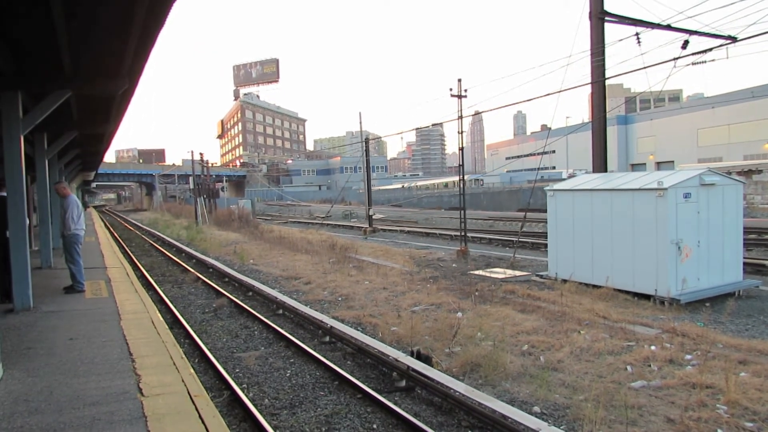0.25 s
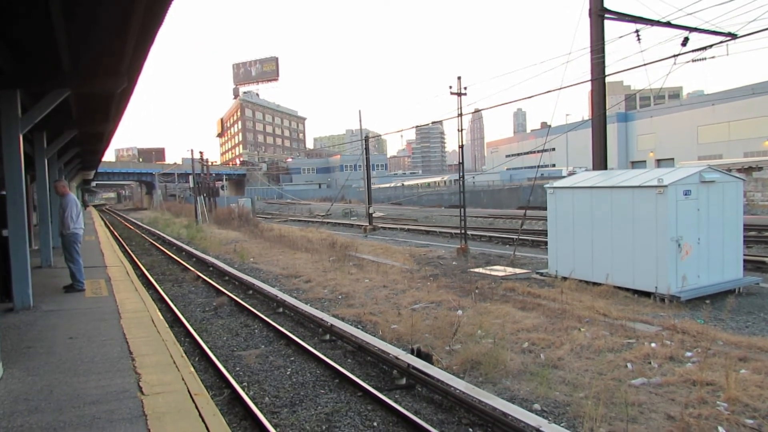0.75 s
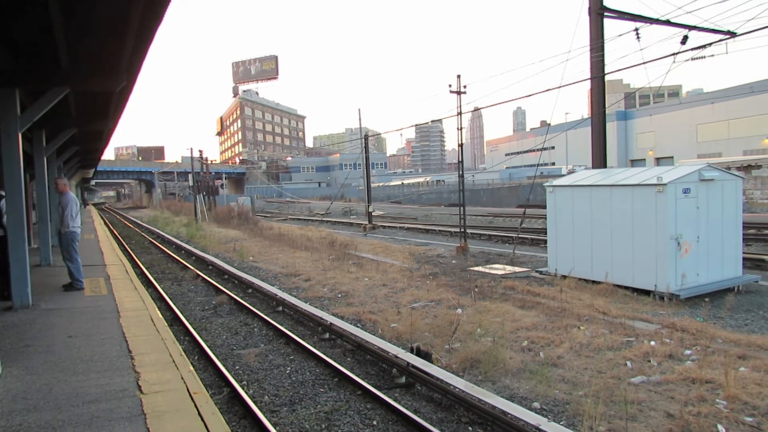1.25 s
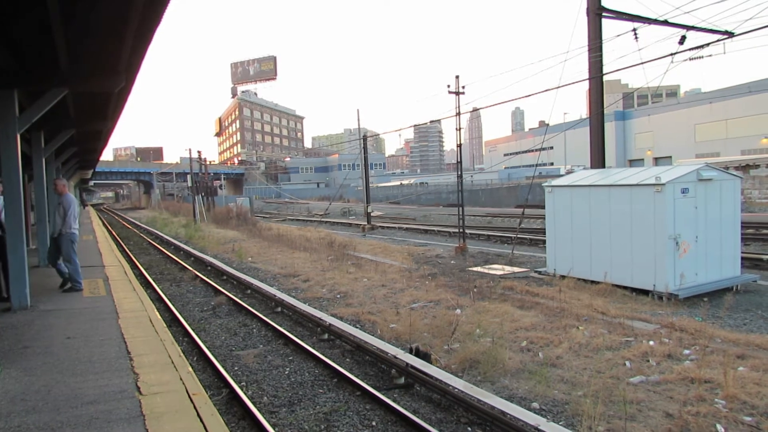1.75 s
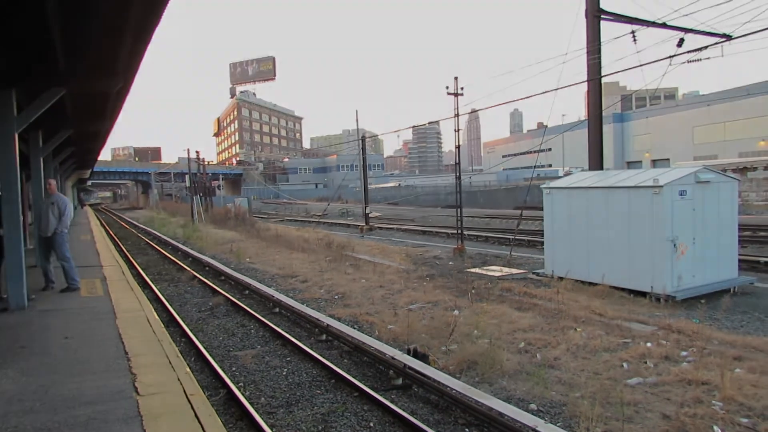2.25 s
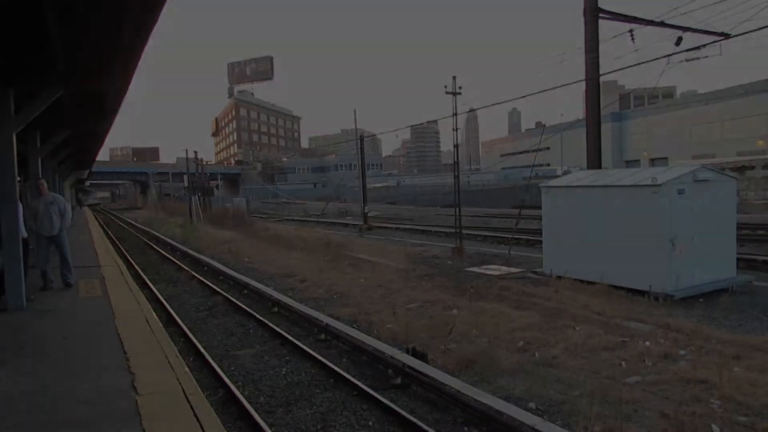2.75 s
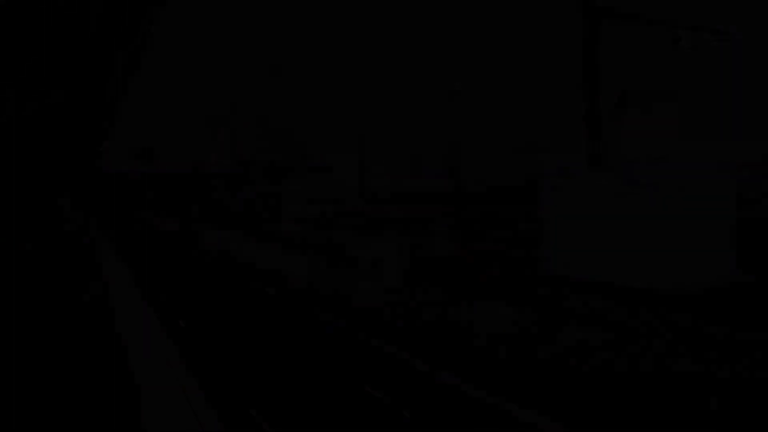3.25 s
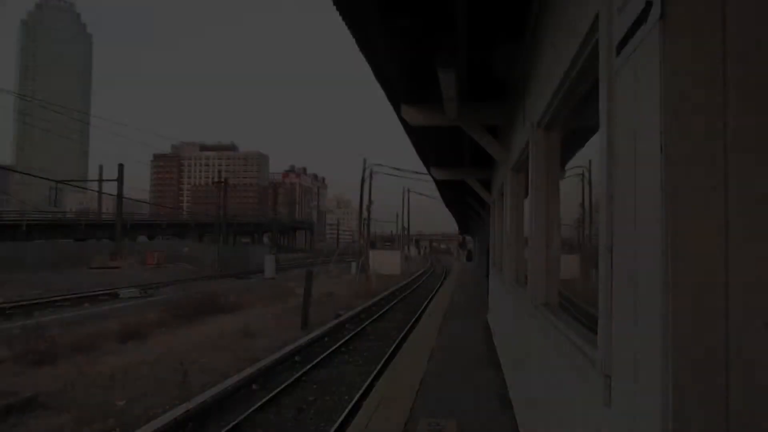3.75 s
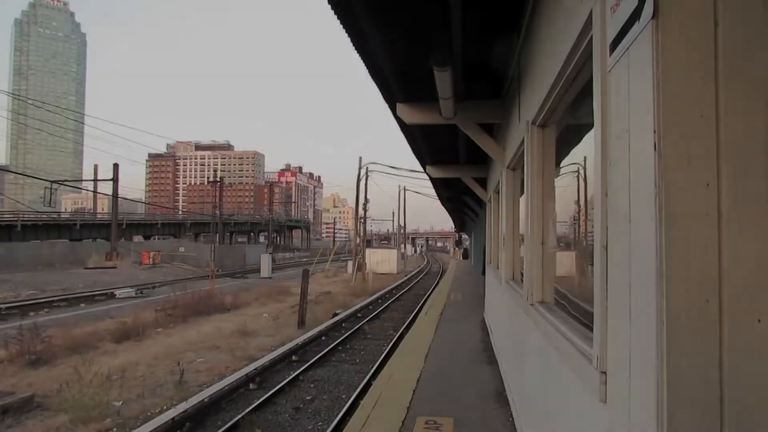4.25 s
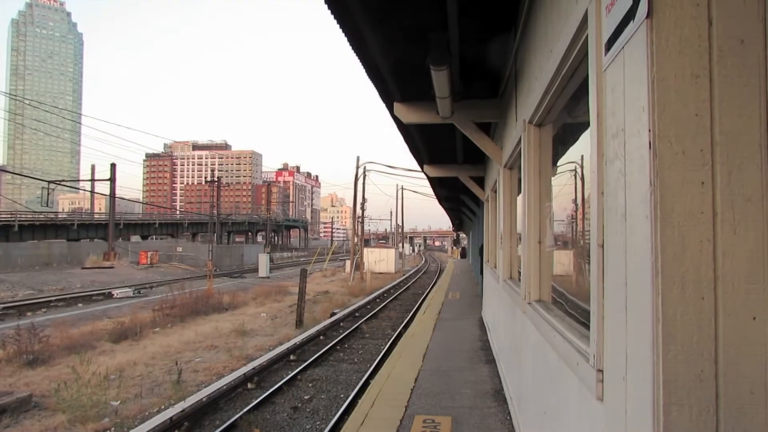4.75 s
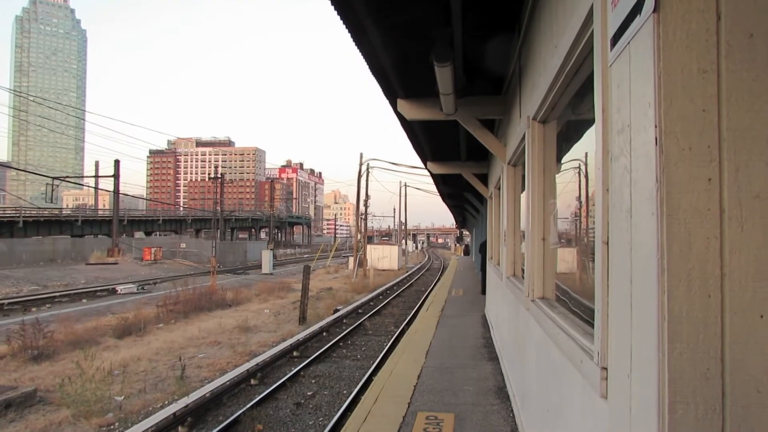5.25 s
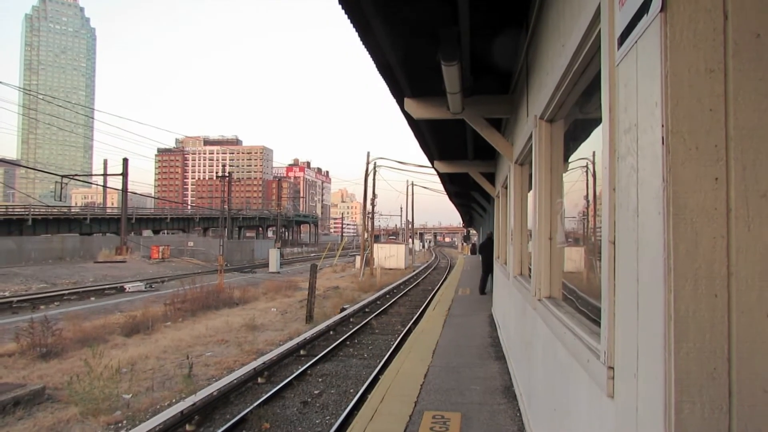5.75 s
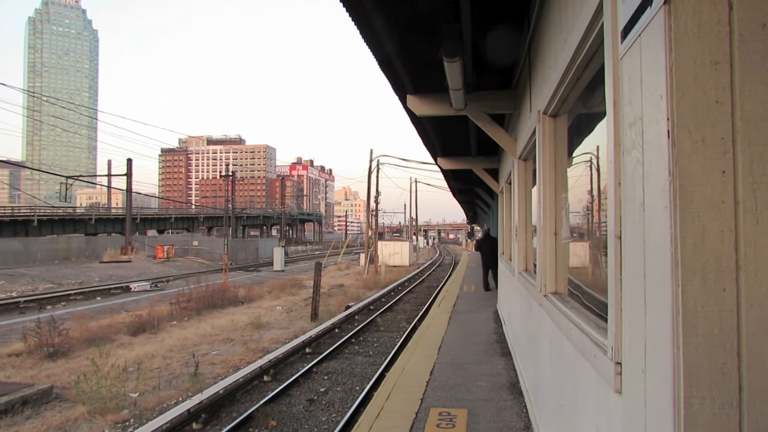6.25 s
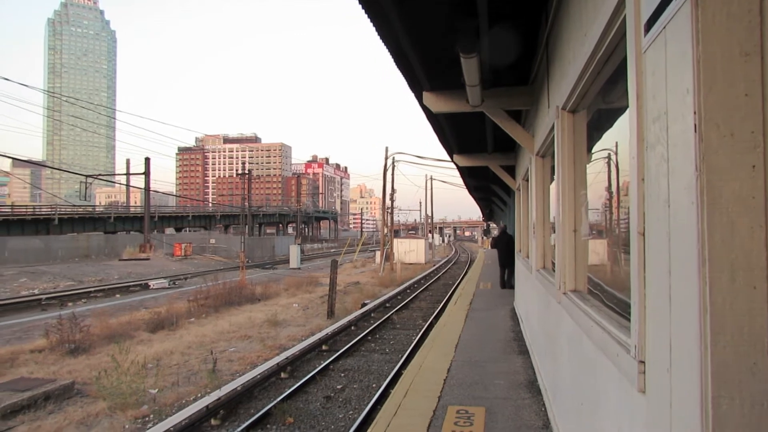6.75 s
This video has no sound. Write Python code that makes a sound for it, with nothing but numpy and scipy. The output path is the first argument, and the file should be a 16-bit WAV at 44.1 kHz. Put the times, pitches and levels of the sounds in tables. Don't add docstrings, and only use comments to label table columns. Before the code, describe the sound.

From 0 s a very deep, steady engine note near 65 Hz dominates, an idling locomotive with faint blurred fan and blower whines. Behind it lie a broad rail-yard roar and soft hiss; thin, high crickets chirp quickly, stronger on the left, with a few tiny dry ticks. From about 1.9 s everything fades, reaching silence around 3.25 s. From 3.4 s a second, similar bed fades in, full by 4.6 s, with more continuous insect tones; a small snap clicks at 3.64 s. At 5.04 s a bright, hissing air-valve blast bursts out and the background ducks. A sharp crack at 5.45 s leads to a second blast at 5.54 s with a singing throat. Small puffs follow each blast until 5.9 s. The drone recovers while a distant train's roar grows; wheels knock over joints at 6.26, 6.41 and 6.63 s, clanking with short echoes, and the bed continues until the end near 7 s.

```python
import sys
import numpy as np
from scipy import signal
from scipy.fft import rfft, irfft, next_fast_len
from scipy.io import wavfile
from scipy.ndimage import uniform_filter1d

SR = 44100
rng = np.random.default_rng(int(sys.argv[2]) if len(sys.argv) > 2 else 0)


def transcribe(signal):
    frames = np.atleast_2d(signal).T
    limited = np.clip(frames, -1, 1)
    pcm = np.round(limited * 32767).astype(np.int16)
    wavfile.write(sys.argv[1], SR, pcm)


def field_ratio(decibels):
    return 10 ** (np.asarray(decibels, dtype=float) / 20)


N = 309141
T, SIZE = np.arange(N) / SR, 2 * next_fast_len(N // 2 + 1)
HZ = np.maximum(np.fft.rfftfreq(SIZE, 1 / SR), 1)
SECOND_SHOT_S = 3.32


def rms_one(x):
    return x / np.sqrt(np.mean(x ** 2) + 1e-20)


def by_shot(pair):
    return np.where(T < SECOND_SHOT_S, pair[0], pair[1])


def ramp(span):
    return np.clip((T - span[0]) / (span[1] - span[0]), 0, 1)


def filtered(x, response):
    return irfft(rfft(x, SIZE) * response)[..., :N]


def at_hz(points, count=1):
    columns = np.array(points)
    return np.interp(np.log(HZ), np.log(columns[:, 0]), columns[:, count])


def coloured(white, spectrum):
    inside = (HZ > spectrum[0][0]) & (HZ < spectrum[-1][0])
    return rms_one(filtered(white, field_ratio(at_hz(spectrum)) * inside))


def narrow(hz, width_hz):
    off_tune = (HZ - hz) / width_hz * 2
    return rms_one(filtered(rng.standard_normal(N), 1 / (1 + off_tune ** 2) ** 1.23))


def drift(rate):
    pole = np.exp(-80 * np.pi * rate / SR)
    white = rng.standard_normal(N // 40 + 2002)
    slow = signal.lfilter([1], [1, -2 * pole, pole * pole], white)[2000:]
    return np.interp(np.arange(N) / 40, np.arange(len(slow)), rms_one(slow))


def panned(x, pan_db):
    return x * field_ratio(np.array([[.5], [-.5]]) * pan_db)


def wide(mid_spectrum, side_spectrum, side_db, lean=1.0):
    # frequency in Hz, pull to the left -1..1,
    # lead of the left port -1..1.
    lean_by_band = [(60, .5, .3), (600, 0, .1), (1500, 0, .4), (2600, 0, -.1), (3800, 0.98, -.3),
                    (5000, 0.6, -.4), (6000, .1, -.1), (16000, 0.1, 0)]
    mid, own = rng.standard_normal((2, N))
    shared = lean * (at_hz(lean_by_band) + 1j * at_hz(lean_by_band, count=2))
    unshared = np.sqrt(np.clip(1 - abs(shared) ** 2, 0, 1))
    side = filtered(mid, shared) + filtered(own, unshared)
    return coloured(mid, mid_spectrum) + field_ratio(side_db) * coloured(side, side_spectrum) * [[1], [-1]]


def engine():
    # centre in Hz, width in Hz, level in dB over the drone.
    whine_bands = [(119, 19, -22), (182.4, 26, -19.5), (244, 28, -29), (619.4, 9.9, -27.5),
                   (904, 10, -50.5)]
    # frequency in Hz, level in dB per Hz.
    rumble_spectrum = [(20, -29), (35, -14), (55, 1.5), (85, -4.5), (110, -19.5)]
    firing_hz, left_lead_rad = by_shot([65.13, 65.14]), by_shot([.17, .055])
    flutter_hz, flutter_db = 2.3, -38
    blower_hz = 477.5

    turn = 2 * np.pi * np.cumsum(firing_hz) / SR + left_lead_rad * [[.5], [-.5]]
    neighbour = field_ratio(flutter_db) * np.sin(turn - 2 * np.pi * flutter_hz * T)
    note = np.sqrt(2) * (np.sin(turn + 1.6) + neighbour)
    whines = sum(field_ratio(db) * narrow(hz, width_hz) for hz, width_hz, db in whine_bands)
    whines += field_ratio(-18.5 + 0.43 * drift(3.2)) * np.sin(2 * np.pi * blower_hz * T + 1.2 * drift(2.7))
    rumble = field_ratio(-20.0) * coloured(rng.standard_normal(N), rumble_spectrum)
    return note * field_ratio(by_shot([.7, .35]) * [[1], [-1]]) + panned(whines + rumble, pan_db=2.3)


def yard():
    # frequency in Hz, level in dB per Hz.
    roar_mid = [(50, -17.5), (85, -20.5), (97, -15), (182, -10.5), (312, -9), (386, -13), (471, -13.5),
                (550, -15.5), (730, -15.5), (2500, -29.5), (3250, -59), (5500, -120)]
    roar_side = [(50, -30), (85, -15), (98, -18), (177, -9), (439, -2.5), (471, -3.5), (513, -2.5),
                 (2500, -12), (3250, -54), (5500, -120)]
    # frequency in Hz, level in dB per Hz.
    hiss_mid = [
        [(1180, -5.5), (2000, -6.5), (3190, -2), (3640, -1), (4250, -4.5), (4310, -4), (5610, -19.5),
         (6160, -36.5), (6400, -43.5), (8320, -67.5), (14100, -120)],
        [(1180, -20), (2000, -9.5), (2560, -0.5), (3990, 0.5), (4290, -1.5), (4870, -3), (6040, -20.5),
         (6400, -31.5), (8320, -60), (14100, -120)],
    ]
    hiss_side = [
        [(1180, -29), (2000, -19), (3040, -4), (3730, 0.5), (4250, -5), (4310, -9.5), (6400, -18),
         (8320, -50.5), (14100, -120)],
        [(1180, -26.5), (2000, -5), (3190, 0.5), (3780, 0.5), (4360, -3.5), (5530, -11.5), (6400, -16),
         (8320, -38.5), (14100, -120)],
    ]
    # frequency in Hz, level in dB per Hz.
    air_mid = [(4500, -7.5), (5200, -7.5), (6300, -25.5), (7000, 1.5), (9600, -19), (11500, -19),
               (14000, -22), (15700, -46)]
    air_side = [(4500, -14.5), (5200, -4), (6500, -2), (8000, -6.5), (10000, -18.5), (11700, -26),
                (13000, -35.5), (15500, -40)]
    nearing = ramp([4.6, 6.73])
    roar_db = by_shot([-8, -9.5]) + 3 * nearing
    hiss_db = by_shot([-15, -19.0]) + 4 * nearing
    air_db = by_shot([-40.5, -37.0]) + 5.0 * nearing

    gust = drift(3.5)
    roar = field_ratio(roar_db + .5 * gust + 0.9 * drift(9)) * wide(roar_mid, roar_side, side_db=-6.0)
    hisses = [wide(mid, side, side_db=-3.0) for mid, side in zip(hiss_mid, hiss_side)]
    hiss = field_ratio(hiss_db + .7 * gust + .7 * drift(7)) * by_shot(hisses)
    air = field_ratio(air_db + 0.76 * gust + 0.98 * drift(7)) * wide(air_mid, air_side, side_db=5.5)
    return roar + hiss + air


def crickets():
    # level in dB over the drone, chirps per second,
    # first chirp in seconds, throb depth in dB, left over right in dB.
    songs = [
        [(-24, 1.6, 0.22, 4, 18), (-32, 1.8, 0.15, 12, 8.5), (-27.5, 1, 0.27, 9, 3.5)],
        [(-28.5, 5.8, .013, 2, 7.5), (-27, 2.7, 0.46, 1, 6.5), (-25.5, .38, 0.75, 4, 1),
         (-27.5, 2.3, .36, 2.5, 10), (-39, 2.7, .06, 0.5, 10)],
    ]
    pitches_hz = [
        [3728.5, 3772, 3858],
        [4107, 3859.5, 3730, 3346, 4630],
    ]
    out = field_ratio(by_shot([-36.5, -44.5])) * narrow(6810, width_hz=180) * [[1], [-1]]
    for shot, insects in enumerate(songs):
        here = by_shot([1 - shot, shot])
        for hz, (db, per_s, first_s, throb_db, pan_db) in zip(pitches_hz[shot], insects):
            beat = np.cos(2 * np.pi * per_s * (T - first_s) + 0.43 * drift(2.0))
            throb = throb_db * (np.tanh(2 * beat + .5) - 1) + 1.7 * drift(8)
            tone = np.sin(2 * np.pi * hz * T + 0.75 * drift(7.2))
            out = out + panned(here * field_ratio(db + throb) * tone, pan_db)
    return out


def nearest_cricket():
    song_hz, every_s, first_s, chirp_s = 4111.2, .1612, .027, 0.11
    chirp_db, answer_db, spread_db = -19, -23, -1.5
    answer_ends_s = 1.22
    song = field_ratio(-28) * np.ones(N)
    for k, (own, other) in enumerate(rng.standard_normal((21, 2))):
        s = first_s + k * every_s
        calls = [(s, chirp_db + spread_db * own)]
        if s < answer_ends_s - every_s / 2:
            calls.append((s + every_s / 2, answer_db + spread_db * other))
        for middle_s, db in calls:
            song = song + field_ratio(db) * np.cos(np.pi * np.clip((T - middle_s) / chirp_s, -.5, .5)) ** 2
    tone = np.sin(2 * np.pi * song_hz * T + 1.2 * drift(7.3))
    return panned(by_shot([1, 0]) * song * tone, pan_db=7.0)


def ticks():
    # start in seconds, peak in dB, lowest Hz, highest Hz, side share 0-1.
    snaps = [
        (.835, -34.5, 6000, 8900, .1),
        (1.321, -42.5, 6550, 14660, 0.4),
        (2.043, -37.5, 7130, 9500, 0.8),
        (3.6441, -27, 3800, 8840, 0.3),
        (3.6436, -19, 3900, 5070, 0),
        (3.654, -36.5, 4610, 8030, .4),
        (5.45, -12.5, 4000, 15000, 0.3),
        (6.637, -14, 1200, 5220, .3),
    ]
    out, dying = np.zeros((2, N)), np.exp(-np.arange(300) / 26.0)
    bursts = rng.standard_normal((len(snaps), 2, 300))
    for (s, db, low_hz, high_hz, share), (mid, side) in zip(snaps, bursts):
        both = (np.sqrt(1 - share) * mid + np.sqrt(share) * side * [[1], [-1]]) * dying
        band = signal.butter(2, [low_hz, high_hz], "band", fs=SR, output="sos")
        start = round(s * SR)
        out[:, start:start + 300] += field_ratio(db) * signal.sosfilt(band, both)
    return out


def jet_gain(rows, sag_db_per_s, fall_db_per_s):
    out = 0
    for s, db, rise_s, hold_s in rows:
        age = np.maximum(T - s - rise_s, 0)
        loss_db = sag_db_per_s * np.minimum(age, hold_s) + fall_db_per_s * np.maximum(age - hold_s, 0)
        out = out + ramp([s, s + rise_s]) ** 0.72 * field_ratio(db - loss_db)
    return out


def sizzle():
    # start in seconds, level in dB, rise in seconds, hold in seconds.
    spits = [
        (1.03, -58.5, .08, .015),
        (1.315, -55, .017, .012),
        (1.775, -64.5, 0.031, 0.071),
        (2.02, -63, .02, 0.011),
        (5.036, -24.5, .023, .05),
        (5.452, -52, 0.0054, .004),
        (5.538, -32.5, 0.015, 0.054),
        (5.7, -59.5, .02, 0.073),
    ]
    # frequency in Hz, level in dB per Hz.
    jet_mid = [(5410, -31.5), (9200, 1), (9420, -5.5), (10200, -4), (11300, -2.5), (13300, -2), (15600, -8)]
    jet_side = [(2940, -32.5), (5000, 2.5), (5580, -6), (6730, 2.5), (7770, 2), (11300, -8), (12400, -15.5),
                (16100, -47.5), (22000, -120)]
    split_hz = [0, 9400, 13000, 30000]
    peak_db, dulling = -26, [.75, 1.0, 1.25]
    level_db = 20 * np.log10(jet_gain(spits, sag_db_per_s=77, fall_db_per_s=166) + 1e-7)
    jet, out = wide(jet_mid, jet_side, side_db=6.5), 0
    for slope, low, high in zip(dulling, split_hz, split_hz[1:]):
        part = filtered(jet, (HZ >= low) & (HZ < high))
        out = out + field_ratio(peak_db + by_shot([1, slope]) * (level_db - peak_db)) * part
    return out


def valve():
    # start in seconds, level in dB, rise in seconds, hold in seconds.
    blasts = [
        (5.042, -20, .015, .065),
        (5.537, -19.5, 0.035, .012),
    ]
    # frequency in Hz, level in dB per Hz.
    body_mid = [
        [(530, -24), (900, -18), (1350, -1), (1830, -5), (2160, 0), (4810, 4), (6300, -11), (6600, -46),
         (8580, -90), (14500, -120)],
        [(530, -58), (900, -20), (1070, -11.5), (2800, -6), (4100, 1.5), (5590, -2), (6280, -25.5),
         (6600, -66.5), (8580, -100), (14500, -120)],
    ]
    body_side = [
        [(530, -32), (900, -10.5), (1350, -4.5), (2210, -3.5), (2530, -15), (2800, -1.5), (6600, -5),
         (8580, -29.5), (14500, -120)],
        [(530, -44), (900, -11), (1170, -22.5), (1400, -15), (2390, -15), (4000, -8.5), (6600, -11.5),
         (8580, -40.5), (14500, -120)],
    ]
    # start in seconds, level in dB, centre in Hz, length in seconds.
    small_puffs = [
        (3.921, -41, 3800, 0.032),
        (5.234, -31, 3600, 0.1),
        (5.354, -31.5, 3570, 0.067),
        (5.707, -27, 3180, 0.1),
        (5.835, -25, 3680, 0.076),
    ]
    throat_hz, throat_db = [4650, 4120], [-10, -4]
    first, second = (wide(mid, side, side_db=-2.5, lean=.7) for mid, side in zip(body_mid, body_side))
    in_second = T >= blasts[1][0]
    body = np.where(in_second, second, first)
    for k, (hz, db) in enumerate(zip(throat_hz, throat_db)):
        throat = field_ratio(db + 3.0 * drift(40)) * narrow(hz, width_hz=600)
        body = body + (in_second == k) * panned(throat, pan_db=5.5)
    gain = jet_gain(blasts, sag_db_per_s=14, fall_db_per_s=141)
    out = gain * field_ratio(0.93 * drift(90)) * body
    for s, db, hz, length_s in small_puffs:
        age = np.clip((T - s) / length_s, 0, 30)
        shape = np.tanh(12 * age) * np.exp(-1.5 * age ** 2)
        out = out + panned(field_ratio(db) * shape * narrow(hz, .45 * hz), pan_db=8)
    return out


def wheels():
    # start in seconds, thud in dB, clank in dB, 60 dB decay in seconds.
    joints = [
        (6.264, -30, -41.5, 0.3),
        (6.411, -23.5, -28, 0.19),
        (6.633, -22.5, -30, 0.21),
    ]
    # frequency in Hz, level in dB per Hz.
    thud_spectrum = [(400, -14), (750, -4), (950, -1), (1500, -6), (2000, -15), (2600, -25)]
    clank_spectrum = [(1500, -4), (2800, -4), (4000, -2), (4700, 2), (5200, -7), (6200, -24)]
    crack_db, crack_s = 4, .006
    slap_db, slap_s = -2, .028
    thud = wide(thud_spectrum, thud_spectrum, side_db=-1.0)
    clank = wide(clank_spectrum, clank_spectrum, side_db=-4.0, lean=.4)
    out = 0
    for s, thud_db, clank_db, t60 in joints:
        age = np.maximum(T - s, 0)
        held = field_ratio(-60 * np.maximum(age - .03, 0) / t60)
        dying = (1 - np.exp(-age / .001)) * held
        slap = (age > slap_s) * np.exp(-np.maximum(age - slap_s, 0) / crack_s)
        crack = field_ratio(crack_db) * np.exp(-age / crack_s) + field_ratio(slap_db) * slap
        out = out + dying * (field_ratio(thud_db) * thud * (1 + crack / 3) + field_ratio(clank_db) * clank * (0.67 + crack))
    return out


def recorder_gain():
    # start in seconds, depth in dB.
    ducks = [
        (5.047, 11),
        (5.565, 9.5),
    ]
    attack_s, recover_s, linger_s, linger_share = .065, 0.22, 3.2, .22
    creep_db_per_s, creep_ends_s = 3.5, 4.98
    db = by_shot([-15.5, -14.0]) - by_shot([0, creep_db_per_s]) * np.maximum(creep_ends_s - T, 0)
    for s, depth_db in ducks:
        age = np.maximum(T - s - attack_s, 0)
        left = (1 - linger_share) * np.exp(-age / recover_s) + linger_share * np.exp(-age / linger_s)
        db = db - depth_db * ramp([s, s + attack_s]) * left
    fade_out = (1 - ramp([1.93, 3.315])) * (1 - ramp([3.237, 3.237 + 0.00084]))
    fade_in = ramp([3.396, 4.61])
    return by_shot([fade_out, fade_in]) * field_ratio(uniform_filter1d(db, size=600))


def scene():
    steady = engine() + yard() + crickets() + nearest_cricket()
    return recorder_gain() * steady + ticks() + sizzle() + valve() + wheels()


def roll_off(x):
    return signal.sosfilt(signal.butter(12, 15700, fs=SR, output="sos"), x)


def record(dry):
    gap_low_hz, gap_high_hz = 6524, 9500
    loud = 1.3 * np.tanh(dry / 1.3)
    inside_hz = np.minimum(HZ - gap_low_hz, gap_high_hz - HZ)
    cancelled = filtered(loud.mean(axis=0), np.clip(inside_hz / 80, 0, 1))
    return roll_off(loud - 0.909 * cancelled)


dry = scene()
out = record(dry)
transcribe(out)
```